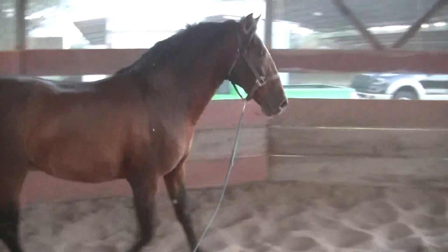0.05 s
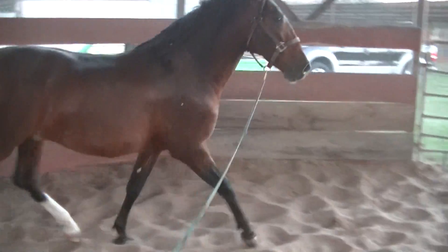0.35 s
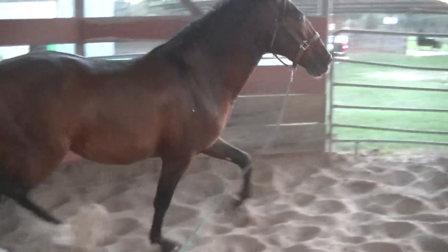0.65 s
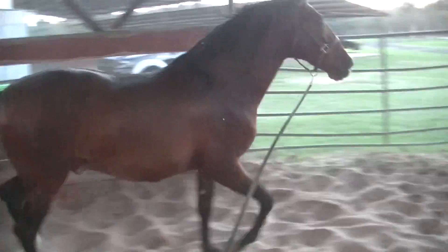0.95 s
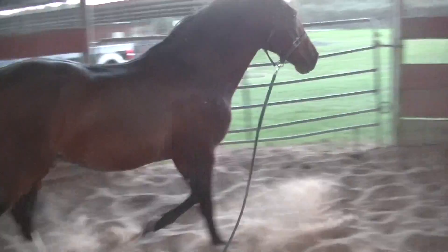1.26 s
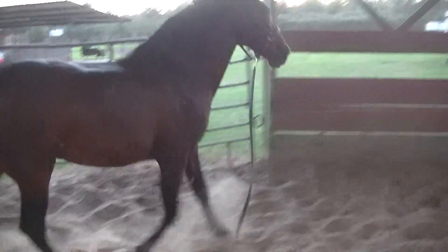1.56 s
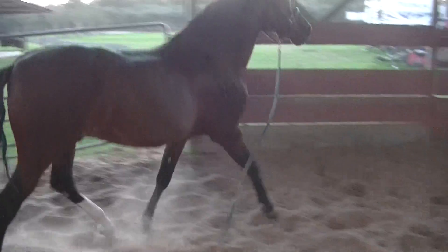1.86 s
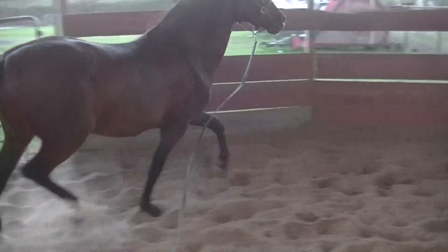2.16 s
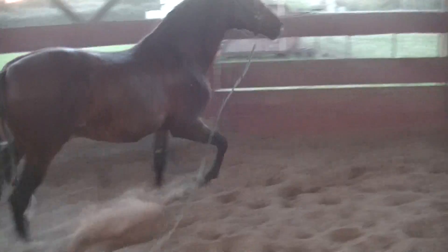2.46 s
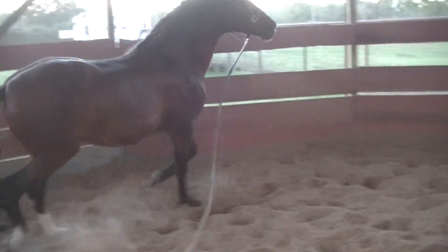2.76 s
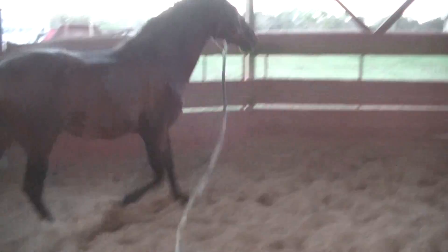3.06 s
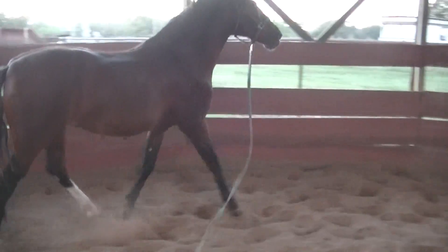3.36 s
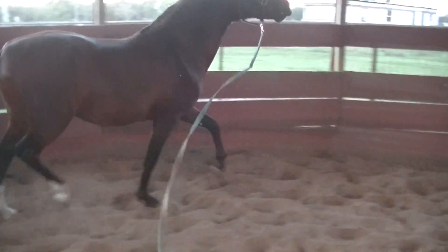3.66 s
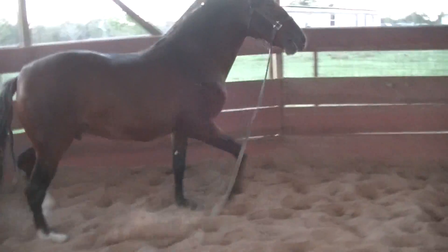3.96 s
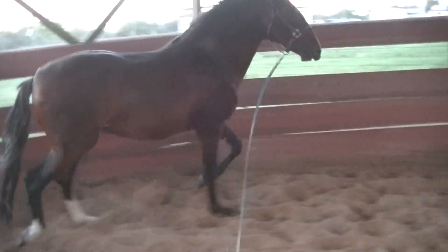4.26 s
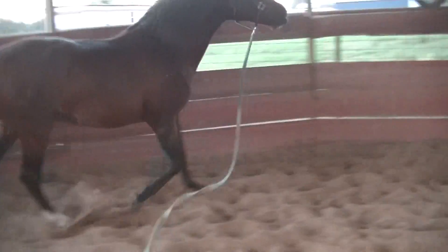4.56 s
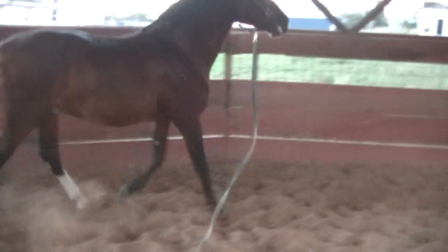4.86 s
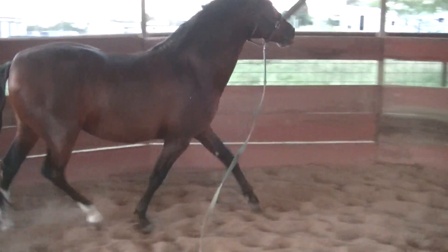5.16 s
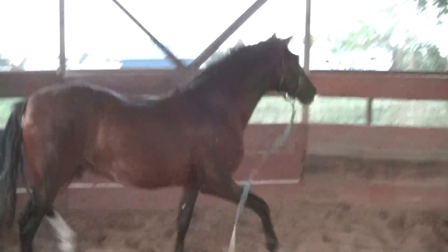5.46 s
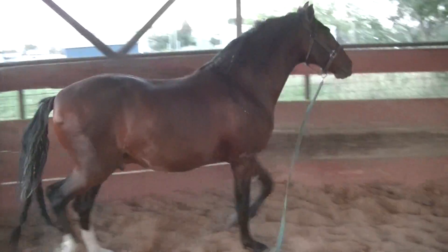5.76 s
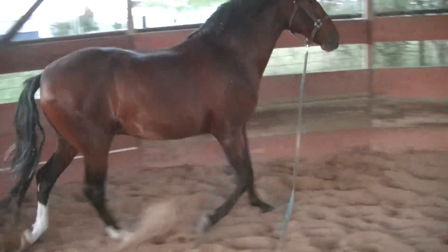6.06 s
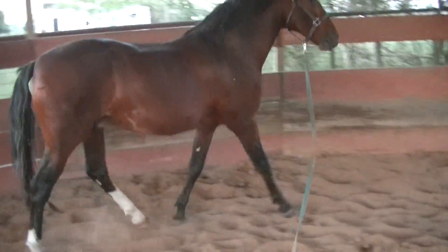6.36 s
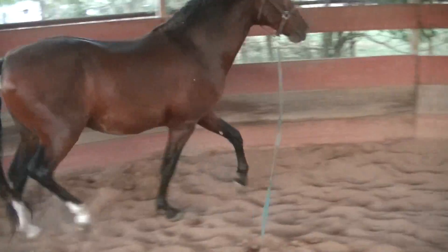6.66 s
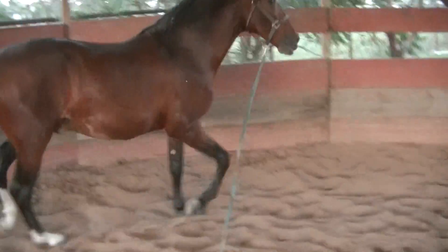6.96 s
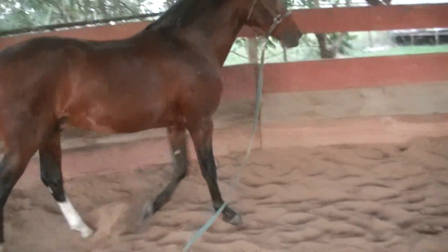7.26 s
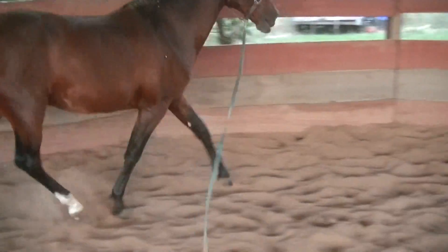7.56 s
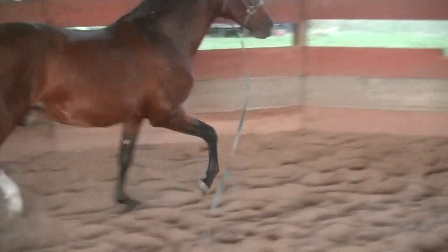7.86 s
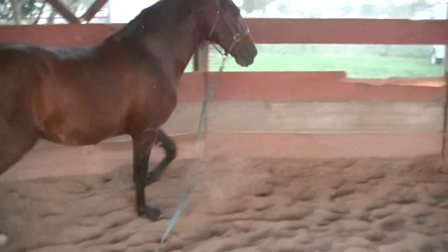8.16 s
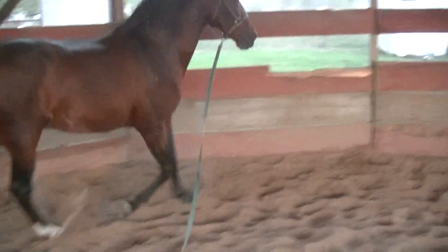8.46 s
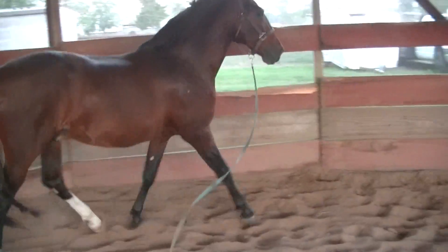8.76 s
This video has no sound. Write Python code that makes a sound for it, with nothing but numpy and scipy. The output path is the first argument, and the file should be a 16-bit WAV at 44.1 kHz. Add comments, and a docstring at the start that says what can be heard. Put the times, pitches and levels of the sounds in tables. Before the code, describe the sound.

One loud, close horse whinny falls into a fluttering grunt, between soft hoofbeats on sand in a roofed arena.

```python
"""Hooves sweep and thud in deep sand as a horse trots in a roofed arena; then it whinnies once, close by.
The whinny has two voices at once: a high squeal that glides up and holds, and a rough voice from the low
folds that breaks in under it and sinks into a fluttering grunt, with air rushing through throat and nose.
A soft snort, small taps and more hoofbeats follow. Boards and roof echo; outdoor air, a faint machine hum,
insects and far birds come in through the open walls."""
import sys
import numpy as np
from scipy import signal
from scipy.fft import rfft, irfft, next_fast_len
from scipy.io import wavfile
from scipy.ndimage import uniform_filter1d

SR = 44100
rng = np.random.default_rng(int(sys.argv[2]) if len(sys.argv) > 2 else 0)


def digitize_waveform(pressure):
    """Quantize a signal to 16-bit integers and store it at the path in sys.argv[1].

    Rows of a 2-D input are taken as channels; values are limited to [-1, 1].
    """
    field = np.atleast_2d(pressure).T
    bounded = np.clip(field, -1, 1)
    quanta = np.round(bounded * 32767).astype(np.int16)
    wavfile.write(sys.argv[1], SR, quanta)


N = 397782
T = np.arange(N) / SR
CALL_START_S, CALL_BREAK_S = 3.62, 4.982


def whinny(flutter_hz=26, flutter_db=4):
    """Squeal over low voice, rushing air, chest and blow; the nostrils flutter as the call runs out."""
    level = low_level()
    puffs, low_phase = low_folds(level)
    throat = low_voice(puffs, level) + rushing_air(puffs, low_phase, level)
    lower = place(throat, pan_db=-1.5) + chest_grunts(puffs) + lip_blow()
    flap = sine(flutter_hz * (1 + .1414 * drift(9)))
    flutter = from_db(flutter_db * flap * np.interp(T, [5.05, 5.2], [0, 1]))
    return squeal(low_phase) + flutter * lower


def call_effort(attack_s=.047, release_s=.086):
    """The horse pushes from the start of the call until the voice breaks."""
    return envelope(CALL_START_S, attack_s, CALL_BREAK_S - CALL_START_S - attack_s, release_s)


def hoarseness(rough=.45, length_s=.17):
    """Extra roughness in both voices while the folds start to move."""
    return rough * bump(CALL_START_S, length_s, length_s)


# upper overtones of the squeal: (multiple, level [dB], left minus right [dB])
SQUEAL_OVERTONES = [(3, -3, -5), (4, -7, -4), (5, -14, 4.5), (6, -17, 2), (7, -24, 2), (8, -30.5, -6.5)]


def squeal(low_phase, jitter=.0077, waver=.0088, shimmer_db=5, throb_db=1.6, coupling_rad=.086):
    """The high voice wavers, and is shaken in pitch and strength by the low folds as it roughens."""
    hz, rough, tone_gain, octave_gain, shrill_gain = squeal_controls()
    slack = np.interp(hz, [1450, 1780], [5, 1])   # breaks up below its held pitch
    bend = rough * (jitter * slack * drift(223) + waver * drift(47)) + .00082 * drift(52)
    phase = 2 * np.pi * np.cumsum(hz * (1 + bend)) / SR + coupling_rad * rough * np.sin(low_phase)

    def overtone(k):
        """No two cycles have quite the same shape, so each overtone wavers on its own."""
        gain = from_db(5 * np.sqrt(np.abs(rough)) * drift(38))
        return gain * np.sin(k * phase + .22 * (1.1 + rough) * drift(82))

    upper = sum(place(from_db(db) * overtone(k), pan_db) for k, db, pan_db in SQUEAL_OVERTONES)
    shimmer = from_db(shimmer_db * rough * np.sqrt(slack) * drift(130))
    shake = np.sqrt(2) * evened(shimmer * (1 + .051 * rough * np.cos(low_phase)))
    tone = place(from_db(throb_db * drift(48)) * tone_gain * np.sin(phase), pan_db=-1.9)
    octave = place(octave_gain * overtone(2), pan_db=-4.5)
    return shake * (tone + octave + shrill_gain * upper / np.sqrt(slack))


# base roughness of the squeal: (time [s], roughness [0-1])
SQUEAL_ROUGHNESS = [(3.62, .3), (3.77, 0.56), (3.87, 0.22), (4.07, 0.28), (4.14, 0.65), (4.39, 0.81),
                    (4.62, 0.3), (4.9, 0.65), (5.03, 0.55)]
# swells of the squeal: (time [s], rise [s], tone [dB], pitch lift [Hz], octave [dB])
SQUEAL_SWELLS = [(3.751, 0.032, -30.5, 11.5, -29), (3.827, 0.0097, -20.5, 0.5, -32),
                 (3.89, 0.031, -14.5, 5.5, -33), (3.932, 0.019, -16, -0.5, -32), (3.973, .024, -17, 2, -33),
                 (4.036, 0.053, -21, 7.5, -32.5), (4.109, 0.026, -10.5, 43, -31.5),
                 (4.162, 0.015, -18.5, 30, -58), (4.21, 0.023, -20.5, 68, -52.5),
                 (4.31, .024, -15.5, 60.5, -38.5), (4.456, .035, -15.5, 57, -30),
                 (4.495, 0.014, -14, 54.5, -28), (4.531, .026, -16, 41, -35),
                 (4.581, 0.035, -17, 9.5, -37.5), (4.687, .036, -13, 4.5, -26),
                 (4.736, .02, -19, 15.5, -31.5), (4.787, 0.041, -12, 41.5, -40),
                 (4.85, 0.0264, -18, 33, -39), (4.902, 0.039, -11.5, 38, -45),
                 (4.985, .022, -16, 33, -47.5)]


def squeal_controls(start_hz=700, held_hz=1840, glide_s=.06, fall_octaves_per_s=5.8, lead_s=.011):
    """The squeal glides up, holds, breaks and falls; each swell makes it louder, higher and clearer."""
    effort = call_effort()
    tone, octave, lift = from_db(-26) * effort, from_db(-38.5) * effort, 0
    rough, = in_time(SQUEAL_ROUGHNESS)
    for s, rise_s, tone_db, lift_hz, octave_db in SQUEAL_SWELLS:
        swell = bump(s, rise_s, .47 * rise_s, power=3)   # flat top, steep flanks
        push = bump(s - lead_s, 1.1 * rise_s, 1.1 * rise_s)
        tone = tone + from_db(tone_db) * swell
        rough = rough * (1 - .35 * swell)
        octave = octave + from_db(octave_db) * push
        lift = np.maximum(lift, lift_hz * push)
    glide_hz = held_hz - (held_hz - start_hz) * np.exp(-np.maximum(T - CALL_START_S, 0) / glide_s)
    hz = (glide_hz + lift) * 2 ** -np.clip(fall_octaves_per_s * (T - CALL_BREAK_S), 0, 1)
    bright = np.minimum(hz / held_hz, 1) ** 1.7
    shrill = effort * from_db(-27 - 27.5 * rough)   # strongest when the voice is clear
    return hz, rough + hoarseness(), tone, bright * octave, bright * shrill


# bursts of the low voice: (time [s], rise [s], fall [s], level [dB])
LOW_BURSTS = [(3.68, 0.044, 0.086, -33.5), (4.237, 0.0092, 0.022, -29), (4.335, 0.021, 0.04, -20),
              (4.44, 0.027, 0.027, -16.5), (4.535, 0.022, 0.051, -26), (4.758, .016, .05, -23),
              (4.884, 0.029, .026, -21.5), (5.03, 0.028, .022, -22), (5.13, 0.075, 0.14, -33.5)]


def low_level(murmur_db=-46.5):
    """The low voice murmurs under the squeal and breaks in with bursts."""
    bursts = sum(from_db(db) * bump(s, rise_s, fall_s) for s, rise_s, fall_s, db in LOW_BURSTS)
    return from_db(murmur_db) * call_effort() + bursts


# low folds rise, hold and sink into the grunt: (time [s], pitch [Hz])
FOLD_PITCH = [(3.6, 168.8), (3.7, 408.8), (4.24, 418.5), (4.32, 467.7), (4.46, 472.5), (4.68, 436.4),
              (4.78, 456.3), (4.88, 429), (4.96, 432), (5.01, 368.2), (5.05, 356.9), (5.13, 205.8),
              (5.5, 175.2)]


def low_folds(level, jitter=.065, shimmer_db=4, leak=.6, clears_at_db=-25):
    """One puff a cycle; weak or slack folds beat less evenly and leak more air. Returns puffs and phase."""
    hz, = in_time(FOLD_PITCH)
    slack = 450 / hz
    rough = .55 / (1 + level / from_db(clears_at_db)) + .3 * np.maximum(slack - 1, 0) + hoarseness()
    cycles = np.cumsum(hz * (1 + jitter * rough * slack * drift(120))) / SR
    offset_samples = ((cycles + .5) % 1 - .5) * SR / hz
    puffs = np.exp(-offset_samples ** 2) * from_db(shimmer_db * rough * drift(160))
    phase = 2 * np.pi * cycles
    leaked = leak * rough * slack * (1 + 1.9 * np.cos(phase)) * rng.standard_normal(N) / 10
    return puffs + leaked, phase


# throat resonances: (centre [Hz], width [Hz], gain [dB])
THROAT_MODES = [(509, 140, -8), (943, 150, -11.5), (1400, 550, 1), (1890, 570, 5.5), (2320, 250, 2.5),
                (3120, 150, 3), (3900, 530, -12), (4870, 940, -21), (7490, 1410, -36)]


def low_voice(puffs, level, gain_db=3, growl_db=2, growl_hz=45):
    """The puffs ring the throat and pass the nose; their unsteady strength makes a growl."""
    voiced = evened(nose(band(resonate(puffs, THROAT_MODES), 300, 12000)))
    return from_db(gain_db + growl_db * drift(growl_hz)) * level * voiced


# nasal notches: (centre [Hz], width [Hz])
NASAL_NOTCHES = [(1080, 230), (2640, 350)]


def nose(x, depth=.51):
    """Side cavities of the nose partly cancel narrow bands."""
    for hz, width_hz in NASAL_NOTCHES:
        notched = signal.lfilter(*signal.iirnotch(hz, hz / width_hz, fs=SR), x)
        x = x + depth * (notched - x)
    return x


# airflow through the call: (time [s], level [dB])
BREATH_FLOW = [(3.59, -75), (3.626, -51.5), (3.696, -54.5), (4.106, -47), (4.122, -38), (4.206, -49),
               (4.216, -38.5), (4.302, -41.5), (4.324, -36), (4.546, -41), (4.594, -45), (4.76, -38),
               (5.148, -44.5), (5.5, -78)]
# breath colour: (frequency [Hz], level [dB])
BREATH_SPECTRUM = [(200, -28.5), (500, -3.5), (1000, -2), (1500, 5), (2150, 14), (2550, -1.5), (3100, 9),
                   (3800, -7), (4500, -2), (6200, -13), (8000, -10.5), (10500, -10), (13000, -18),
                   (15500, -30.5)]


def rushing_air(puffs, low_phase, level, gain_db=11, pulsing=.41, buzz_db=4, buzz_knee_db=-33):
    """Turbulence chopped by the low folds, buzzing when they beat hard; a slack throat dulls it."""
    chopped = rms_one(rng.standard_normal(N) * (1 + pulsing * np.cos(low_phase)))
    buzz = from_db(buzz_db) * evened(puffs) * level / (level + from_db(buzz_knee_db))
    breath = tinted(evened(chopped + buzz), BREATH_SPECTRUM)
    bright = rms_one(nose(band(breath, 276, 15500)))
    dull = tinted(bright, [(2400, 0), (4800, -1), (9600, -13)])
    fold_hz, = in_time(FOLD_PITCH)
    taut = np.minimum(fold_hz / 460, 1) ** 2.2
    return from_db(gain_db) * gated_gain(BREATH_FLOW) * (dull + (bright - dull) * taut)


# chest resonances: (centre [Hz], width [Hz], gain [dB])
CHEST_MODES = [(113, 28.5, -6.5), (196, 28, 9), (386.4, 100, 1), (575, 56, 6.5), (850, 97, -11)]
# grunts: (time [s], attack [s], hold [s], decay [s], level [dB])
CHEST_GRUNTS = [(3.602, 0.014, .07, 0.072, -29.5), (4.977, 0.066, 0.14, 0.11, -30)]


def chest_grunts(puffs):
    """The puffs ring the chest as the call opens and closes."""
    level = sum(from_db(db) * envelope(*shape) for *shape, db in CHEST_GRUNTS)
    return level * evened(band(resonate(puffs, CHEST_MODES), 85, 950))


def lip_blow(level_db=-40.5):
    """Lips and nostrils flap with a low rumble at the end of the call."""
    rumble = coloured([(25, -26), (55, 0), (75, -20), (110, 5.5), (170, -8), (400, -18), (2000, -83)])
    return from_db(level_db) * envelope(5, attack_s=.16, hold_s=-.11, decay_s=.28) * evened(rumble)


def snort(start_s=6.17, level_db=-46.5, hollow_db=-2, hiss_db=-4, rasp_db=-11):
    """A soft blow through the nostrils: a raspy start, then a hollow rush."""
    hollow = from_db(hollow_db) * noise_band(hz=630, width_hz=270)
    rasp = from_db(rasp_db) * grainy(1900, 3940, depth_db=3.1, rate_hz=150)
    rush = hollow + from_db(hiss_db) * coloured(SWISH_SPECTRUM)
    blow = envelope(start_s, .07, .08, .11) * rush + envelope(start_s, .011, .02, .061) * rasp
    return from_db(level_db) * blow


# hoof drags: (time [s], level [dB], fall [s])
HOOF_DRAGS = [(.082, -47, .05), (0.621, -48, 0.13), (1.39, -47.5, 0.15), (1.97, -46, 0.1),
              (2.569, -49, .11), (3.14, -47, .11), (6.89, -49.5, 0.076), (7.211, -67, 0.034),
              (7.69, -50, 0.023), (8.21, -51.5, 0.054), (8.89, -46, 0.11)]
# hiss of sand and snort: (frequency [Hz], level [dB])
SWISH_SPECTRUM = [(150, -5), (400, -2), (700, 4), (1000, -3), (1500, 0.5), (2500, -9.5), (4500, -18),
                  (8000, -23.5), (15000, -29)]


def sand_sweeps(rise_s=.047, hollow_db=-3, hiss_db=-3, grain_db=-27):
    """A dragging hoof throws a hollow swish of sand grains."""
    level = 0
    for s, db, fall_s in HOOF_DRAGS:
        fade = np.where(T < s, ((T - s) / rise_s) ** 2, (T - s) / fall_s)
        level = level + from_db(db) * np.exp(-fade.clip(0, 50))
    hollow = from_db(hollow_db) * noise_band(hz=730, width_hz=260)
    grains = from_db(grain_db) * grainy(2500, 12000, depth_db=10, rate_hz=900)
    hiss = from_db(hiss_db) * coloured(SWISH_SPECTRUM)
    return level * (hollow + grains + hiss)


# hoof landings: (time [s], level [dB])
HOOF_LANDINGS = [(0.816, -42), (1.564, -42.5), (2.298, -43), (3.023, -40), (6.15, -49), (7.029, -47.5),
                 (7.249, -52), (7.66, -47), (8.069, -45)]


def hoof_thuds(decay_s=.028):
    """A hoof lands in deep sand with a dull thud."""
    push = sum(from_db(db) * envelope(s, .001, 0, decay_s) for s, db in HOOF_LANDINGS)
    ground = [(40, -27), (110, -3.5), (280, -2), (450, -14.5), (1000, -12.5), (2500, -28), (9000, -45)]
    return push * coloured(ground)


# small taps: (time [s], body [dB], snap [dB])
NEAR_TAPS = [(1.143, -59, -43.5), (1.526, -43, -46), (6.847, -43, -45), (7.029, -53.5, -47.5),
             (7.195, -40, -55), (7.431, -41, -60), (7.783, -51, -41.5), (7.864, -53, -39),
             (7.876, -31.5, -33), (7.893, -54, -40), (7.964, -42.5, -42), (7.983, -45, -46),
             (8.033, -35, -57)]
# tap resonances: (centre [Hz], width [Hz], gain [dB])
TAP_BODY_MODES = [(374, 180, 0.5), (651.9, 190, -0.5), (1100, 500, 0.5), (2120, 1900, -7.5)]


def taps(body_gain_db=-7, snap_gain_db=-6, body_s=.02, snap_s=.0085, tick_count=8):
    """Each tap is a bright snap and a crunch that rings damped modes; faint ticks fall at random."""
    out, t = np.zeros(N + SR), np.arange(SR // 10) / SR
    ticks = rng.uniform((5.5, -52.5, -52.5), (8.4, -47.5, -47.5), (tick_count, 3))   # as NEAR_TAPS
    for s, body_db, snap_db in [*NEAR_TAPS, *ticks]:
        ring = resonate(rng.standard_normal(len(t)) * np.exp(-t / body_s), TAP_BODY_MODES)
        body = from_db(body_db + body_gain_db) * 2 * ring / np.abs(ring).max()
        snap = band(rng.standard_normal(len(t)) * np.exp(-t / snap_s), 1900, 9100)
        at = round(s * SR)
        out[at:at + len(t)] += body + from_db(snap_db + snap_gain_db) * snap
    return out[:N]


# arena tail: (frequency [Hz], t60 [s], level [dB])
ARENA_TAIL = [(125.7, 1, 2.5), (500, 0.66, 2), (1900, 1.01, -5.5), (3400, 0.6, -4), (14240, 0.25, -10.5)]


def arena(x, early_db=-14, early_s=.11, echoes_per_s=900, tail_db=-18, width=.73, wide_above_hz=1500):
    """Near boards and roof send back a quick cluster of echoes, then a faint long tail."""
    t, edges_hz = np.arange(SR) / SR, np.geomspace(80, 14000, 10)
    white, tail = rfft(rng.standard_normal((2, SR))), 0
    hz = np.arange(white.shape[1])
    knots_hz, *columns = np.transpose(ARENA_TAIL)
    for low, high in zip(edges_hz, edges_hz[1:]):
        t60_s, db = [np.interp(np.log(low * high) / 2, np.log(knots_hz), c) for c in columns]
        tail = tail + irfft(white * ((hz >= low) & (hz < high)), SR) * from_db(db - 60 * t / t60_s)
    echoes = rng.standard_normal((2, SR)) * (rng.random((2, SR)) < echoes_per_s / SR)
    early = from_db(early_db) * rms_one(echoes * np.exp(-t / early_s))
    response = (early + from_db(tail_db) * rms_one(tail)) * (t > .005) / np.sqrt(SR)
    mid, side = signal.fftconvolve(x.mean(axis=0)[None], response, axes=1)[:, :N]
    side = signal.lfilter(*signal.butter(1, wide_above_hz, "high", fs=SR), side)
    return x + mid + width * side * np.array([[1], [-1]])


# outdoor air, early and late: (frequency [Hz], level [dB])
OUTDOOR_EARLY = [(15, -53), (25, -27.5), (53, -4.5), (82, -11), (113, -11), (160, -4), (183, -13),
                 (289, -7.5), (598, -13.5), (848, -12), (1080, -13), (1380, -11.5), (2920, -25),
                 (5140, -27.5), (11000, -38.5), (15500, -46)]
OUTDOOR_LATE = [(15, -49), (25, -21.5), (55, -7), (86, -20), (116, -11), (240, -13.5), (389, -17.5),
                (433, -12), (482, -17.5), (826, -15), (997, -17), (1450, -18), (5730, -38.5), (8580, -40.5),
                (11000, -40), (15500, -53)]
# its stereo width: (frequency [Hz], side minus mid [dB])
OUTDOOR_WIDTH = [(60, -11), (110, -9.5), (200, -12), (380, -12), (700, -11), (1290, -12), (2380, -8),
                 (4400, -3.5), (8120, -1), (15000, -1)]


def outdoor_air(early_db=-54.5, late_db=-55):
    """Air heard through the open walls; it grows duller during the whinny."""
    blend = np.interp(T, [3.8, 5.4], [0, 1])
    early, late = from_db(early_db) * np.sqrt(1 - blend), from_db(late_db) * np.sqrt(blend)
    mid, side = [early * coloured(OUTDOOR_EARLY) + late * coloured(OUTDOOR_LATE) for _ in range(2)]
    return mid * from_db(.73 * drift(2.3)) + tinted(side, OUTDOOR_WIDTH) * np.array([[1], [-1]])


# machine hum, one list before the call and one after: (time [s], drone [dB], whine [dB])
HUM_LEVELS = [
    [(0.0, -59, -60.5), (0.82, -65, -64.5), (1.16, -61, -64.5), (1.94, -71, -69), (2.93, -56, -70),
     (3.55, -58, -62.5)],
    [(5.8, -60, -73), (6.05, -62.5, -72), (6.35, -57, -55.5), (7.35, -77, -70.5), (7.64, -67, -61),
     (9.0, -75, -63)],
]


def machine_hum(drone_hz=111, whine_hz=837, gain_db=2, dip_db=-10):
    """Distant machines drone and whine unsteadily; the level dips while the horse calls."""
    tones = zip((drone_hz, whine_hz), in_time(np.vstack(HUM_LEVELS)))
    hum = sum(from_db(gain_db + db + 2 * drift(3)) * sine(hz + 3 * drift(9.2)) for hz, db in tones)
    return hum * from_db(dip_db * call_effort())


# insect bands: (centre [Hz], width [Hz], level [dB], start [s], end [s])
INSECT_BANDS = [(5250, 550, -71.5, 0, 5.4), (8740, 300, -79.5, 6.4, 9.3)]


def insects():
    """Narrow hiss of insects in the field, one kind after the other."""
    return sum(gated_gain([(start_s, db), (end_s, db)]) * noise_band(hz, width_hz)
               for hz, width_hz, db, start_s, end_s in INSECT_BANDS)


# far birds: (time [s], length [s], start pitch [Hz], end pitch [Hz], level [dB])
BIRD_WHISTLES = [(0.304, 0.11, 4340, 4350, -68), (1.12, 0.12, 4340, 4330, -66),
                 (2.68, .16, 3820, 3820, -71), (2.86, 0.15, 3380, 3300, -70)]


def birds():
    """Thin, nearly level whistles from the trees outside."""
    out = np.zeros(N)
    for s, length_s, start_hz, end_hz, db in BIRD_WHISTLES:
        along = np.clip((T - s) / length_s, 0, 1)
        out += from_db(db) * np.sin(np.pi * along) * sine(start_hz + (end_hz - start_hz) * along)
    return out


def from_db(db):
    """Decibels to gain."""
    return 10 ** (np.asarray(db) / 20)


def rms_one(x):
    """Scale to rms 1."""
    return x / np.sqrt(np.mean(x ** 2) + 1e-20)


def evened(x):
    """Hold the short-term rms at 1."""
    return x / np.sqrt(np.abs(uniform_filter1d(x * x, size=1100)) + 1e-12)


def place(x, pan_db):
    """Mono to stereo, left minus right in dB."""
    return x * from_db(np.array([[.5], [-.5]]) * pan_db)


def in_time(rows):
    """Each column of a curve at every sample."""
    s, *columns = np.transpose(rows)
    return [np.interp(T, s, c) for c in columns]


def gated_gain(rows):
    """A dB curve as a gain that fades out just beyond its ends."""
    start_s, end_s = rows[0][0], rows[-1][0]
    gate = np.interp(T, [start_s - .01, start_s, end_s, end_s + .03], [0, 1, 1, 0])
    return gate * from_db(in_time(rows)[0])


def envelope(start_s, attack_s, hold_s, decay_s):
    """Straight attack, hold, exponential decay; a negative hold starts the decay within the attack."""
    age_s = T - start_s
    return np.clip(age_s / attack_s, 0, 1) * np.exp(-np.clip((age_s - attack_s - hold_s) / decay_s, 0, 50))


def bump(s, rise_s, fall_s, power=2):
    """A rounded swell of height 1."""
    return np.exp(-np.minimum(np.abs((T - s) / np.where(T < s, rise_s, fall_s)) ** power, 50))


def sine(hz):
    """Sine that follows a frequency curve."""
    return np.sin(2 * np.pi * np.cumsum(hz) / SR)


def drift(rate_hz):
    """Smooth random wandering up to a given rate, without extreme swings; rms 1."""
    slow = signal.sosfilt(signal.butter(4, rate_hz, fs=SR, output="sos"), rng.standard_normal(N))
    return rms_one(np.tanh(rms_one(slow) / 2))


def band(x, low_hz, high_hz):
    """Butterworth band-pass."""
    return signal.sosfilt(signal.butter(2, [low_hz, high_hz], "band", fs=SR, output="sos"), x + 1e-18)


def resonate(x, modes):
    """Parallel resonances with alternating signs."""
    out = 0
    for k, (hz, width_hz, db) in enumerate(modes):
        r = np.exp(-np.pi * width_hz / SR)
        feedback = [1, -2 * r * np.cos(2 * np.pi * hz / SR), r * r]
        ring = signal.lfilter(np.array([1, 0, -1]) * (1 - r * r) / 2, feedback, x)
        out = out + (-1) ** k * from_db(db) * ring
    return out


def tinted(x, spectrum):
    """Filter by (frequency [Hz], gain [dB]) points on a log-frequency axis."""
    size = next_fast_len(N, True)
    hz = np.arange(size // 2 + 1) * SR / size
    knots_hz, knots_db = np.transpose(spectrum)
    db = np.interp(np.log(hz + 1e-3), np.log(knots_hz), knots_db)
    return irfft(rfft(x, size) * from_db(db), size)[:N]


def coloured(spectrum):
    """Noise of a given colour, rms 1."""
    return rms_one(tinted(rng.standard_normal(N), spectrum))


def noise_band(hz, width_hz):
    """Narrow noise, rms 1."""
    return rms_one(band(rng.standard_normal(N), hz - width_hz / 2, hz + width_hz / 2))


def grainy(low_hz, high_hz, depth_db, rate_hz):
    """Band noise with a flickering level, rms 1."""
    return rms_one(band(rng.standard_normal(N) * from_db(depth_db * drift(rate_hz)), low_hz, high_hz))


def scene():
    """The horse under the roof, the outdoors behind."""
    near = whinny() + snort() + sand_sweeps() + hoof_thuds() + taps()
    return arena(near) + outdoor_air() + machine_hum() + insects() + birds()


def record(dry, ceiling=.9, cutoff_hz=15700):
    """The loudest peaks are rounded, and the top treble is cut steeply."""
    rounded = dry / (1 + (dry / ceiling) ** 6) ** (1 / 6)
    return signal.sosfilt(signal.ellip(10, .1, 80, cutoff_hz, fs=SR, output="sos"), rounded)


dry = scene()
out = record(dry)
digitize_waveform(out)
```